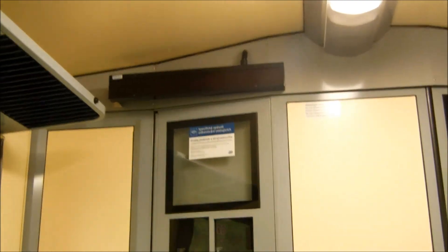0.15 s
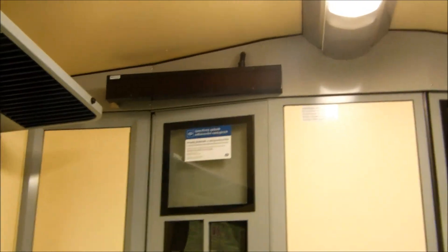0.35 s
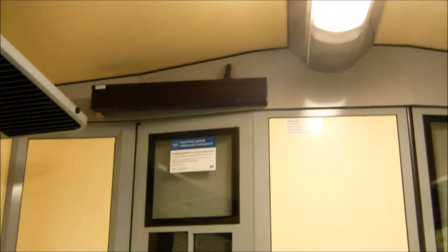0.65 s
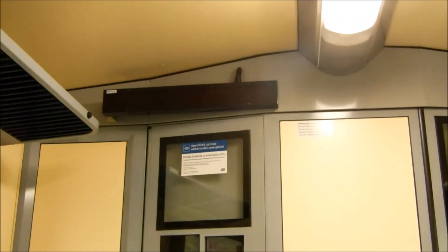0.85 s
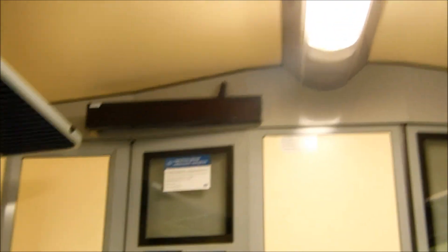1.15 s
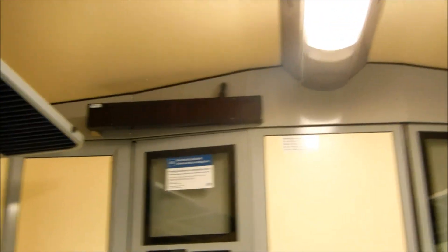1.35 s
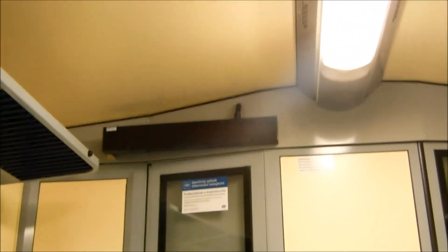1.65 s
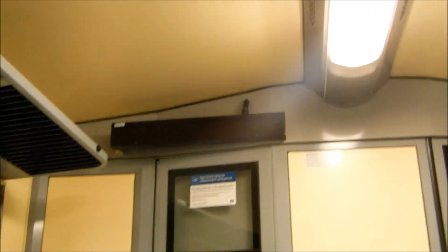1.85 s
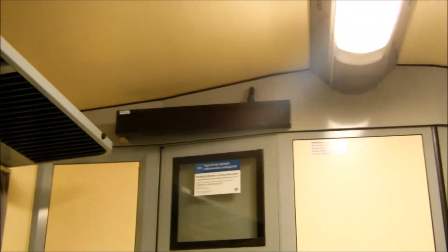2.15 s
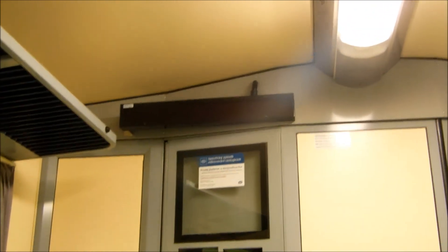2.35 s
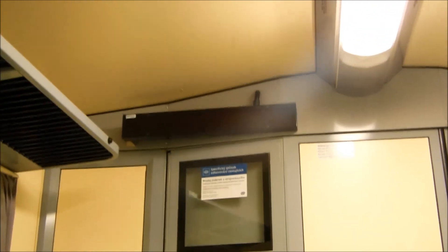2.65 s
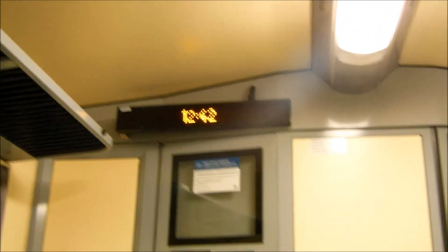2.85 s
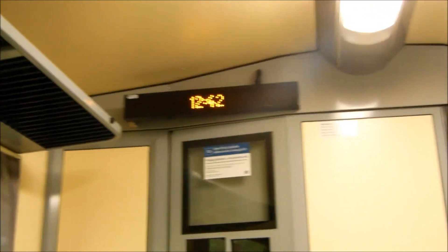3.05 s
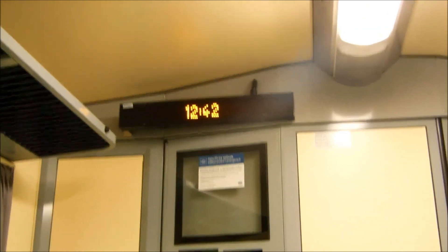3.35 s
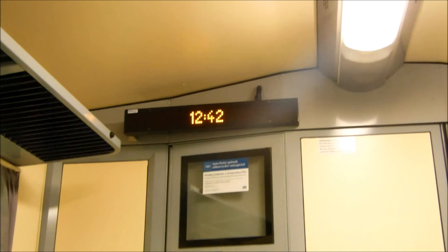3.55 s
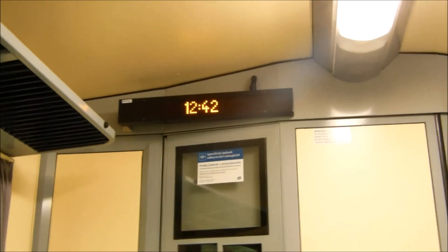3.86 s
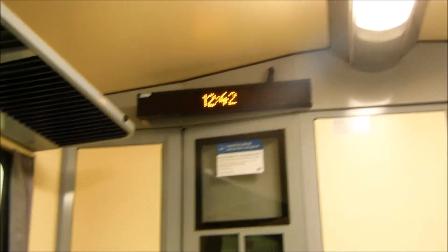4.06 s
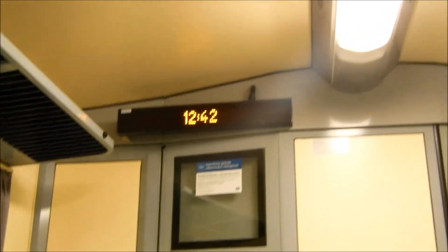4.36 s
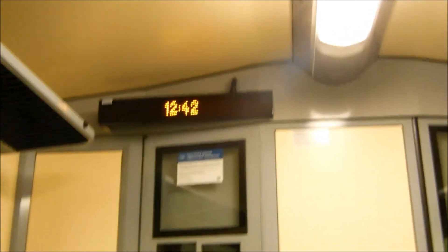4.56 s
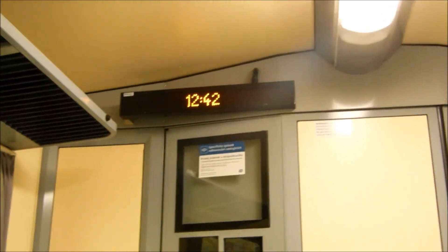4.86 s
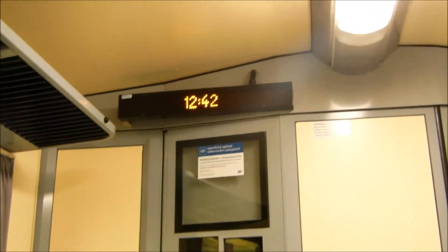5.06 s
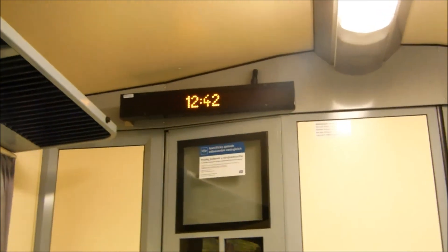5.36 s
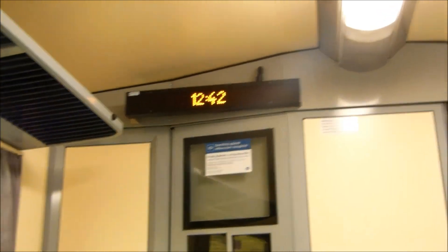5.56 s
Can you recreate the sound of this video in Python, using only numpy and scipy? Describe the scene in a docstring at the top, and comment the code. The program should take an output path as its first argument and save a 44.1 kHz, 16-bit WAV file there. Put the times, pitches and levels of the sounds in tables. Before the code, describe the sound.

Inside a moving passenger train, heavy low rumble throbs and swells continuously over a dull wheel roar and soft flickering rattle.

```python
"""A deep, uneven boom fills the carriage of a running passenger train, heard at two microphone ports.
Wheels on rough rail shake the bogies (wheel frames) and the body shell, which boom at their low modes.
A hum near 160 Hz wavers in the boom: a tone mixed with narrow noise. Noise shaped in pitch and time
makes the roar of the wheels through the floor and the gusts of buzz from loose trim."""
import sys
import numpy as np
from scipy import signal
from scipy.fft import irfft, next_fast_len
from scipy.io import wavfile
from scipy.ndimage import uniform_filter1d

SR = 44100
rng = np.random.default_rng(int(sys.argv[2]) if len(sys.argv) > 2 else 0)


def transcribe(signal):
    """Save signal, clipped to [-1, 1], as a 16-bit WAV file at the path in sys.argv[1]."""
    frames = np.atleast_2d(signal).T
    limited = np.clip(frames, -1, 1)
    pcm = np.round(limited * 32767).astype(np.int16)
    wavfile.write(sys.argv[1], SR, pcm)


N = 251811  # length of the sound in samples


def gain_of(db):
    """Turns decibels into an amplitude factor."""
    return 10 ** (np.asarray(db) / 20)


def evened(x):
    """Scales a signal to an rms (average strength) of 1."""
    return x / np.sqrt(np.mean(x ** 2) + 1e-20)


def read(points, hz):
    """Reads a curve of (f/Hz, value) between its points, on a log-frequency axis."""
    f, value = np.transpose(points)
    return np.interp(np.log(hz + 1), np.log(f + 1), value)


def columns(rows, t):
    """Reads every column of a (t/s, values...) table at the times t."""
    s, *values = np.transpose(rows)
    return [np.interp(t, s, v) for v in values]


def resonance(hz, f, width):
    """A peak of height 1 at f that falls to one half at width / 2 on either side."""
    return 1 / (1 + (2 * (hz - f) / width) ** 2)


def steadied(x, seconds):
    """Evens out the slow chance swells of a two-channel noise, so that the shaking can set its level."""
    width = max(round(seconds * SR), 1)
    power = (x ** 2).mean(0)
    power = uniform_filter1d(uniform_filter1d(power, width), width)
    return x / np.sqrt(abs(power) + 1e-3)


def port_pair(shape, hz):
    """Random spectra at two ports: mostly alike in the bass, much less alike in the treble."""
    # left-right likeness; 1 is identical, 0 unrelated, below 0 partly opposite: (f/Hz, likeness)
    likeness_points = [(60, 0.87), (110, 1.0), (200, 0.98), (370, 0.99), (670, 0.99), (1230, 0.92),
                       (2250, 0.74), (4120, 0.32), (7540, -0.2), (13800, 0.34)]
    a, b, c, d = np.moveaxis(rng.standard_normal(shape + (4,)), -1, 0)
    same = np.clip(read(likeness_points, hz), -1, 1)
    left = a + 1j * b
    unrelated = c + 1j * d
    right = same * left + np.sqrt(1 - same ** 2) * unrelated
    return np.array([left, right])


def smooth_noise(shape, *widths):
    """Random values averaged over the given width along each axis, then scaled to rms 1."""
    x = rng.standard_normal(shape)
    for axis, width in enumerate(widths):
        x = uniform_filter1d(x, size=width, axis=axis)
    return evened(x)


def wide_noise(colour_db, size, patchy_db, flicker_db, ripple_db):
    """Short-time random spectra with drifting patches, a flicker shared by all pitches and a fixed ripple."""
    # left minus right level: (f/Hz, difference/dB)
    leftward_points = [(200, 0), (1500, -0.05), (2600, -0.7), (4000, -0.3), (5500, -4), (7500, -5.5),
                       (9500, -5.5), (11500, 5), (14000, 3)]
    hop = size // 4
    frames = 4 * N // size + 5
    hz = np.fft.rfftfreq(size, 1 / SR)
    t = np.arange(frames)[:, None] * size / 4 / SR

    patches = smooth_noise((frames, len(hz)), 10, 12)
    flicker = smooth_noise(frames, 4)[:, None]
    ripple = smooth_noise(len(hz), 2)  # the many small modes of the cabin
    field_db = patchy_db * patches + flicker_db * flicker + ripple_db * ripple

    spectra = port_pair(patches.shape, hz) * gain_of(colour_db(t, hz) + field_db)
    half_each_way = np.array([.5, -.5])[:, None, None]
    spectra *= gain_of(half_each_way * read(leftward_points, hz))
    _, sound = signal.istft(np.swapaxes(spectra, 1, 2), nperseg=size, noverlap=size - hop)
    return evened(sound[:, :N])


def gusts(t):
    """Lift/dB and tilt/(dB per octave) of the buzz: a gust fades in, drifts in strength and fades out."""
    # gusts of buzzing trim:
    # (start/s, length/s, lift at start/dB, lift at end/dB, added brightness/(dB per octave))
    gust_rows = [(0.032, 0.099, 4, 1.5, 0), (0.298, .42, 2, 4.5, .5), (0.819, .22, 5, 4, .3),
                 (1.099, .19, 6, 10, 0), (1.357, .27, 5, 1.5, -1.5), (1.72, .25, 5.5, 3, 1),
                 (2.043, .14, 3.5, 0.5, 0.3), (2.239, .11, 6, 2.5, -0.5), (2.467, 0.091, 6, 3.5, 1.1),
                 (2.6, .2, 2, 3, 0.3), (2.9, .12, 1.5, 3, -0.5), (3.096, .45, 6.5, 6, -0.7),
                 (3.617, .1, 2, 2, -1), (3.811, .24, 5.5, 4.5, -0.4), (4.242, .17, 2.5, 3.5, .7),
                 (4.456, .07, 7.5, 5.5, -1.1), (4.822, .12, 2, 5, -0.2), (5.0, .05, 3, 4, -1.2),
                 (5.258, .24, 2, 4, 0.5), (5.568, .07, 3.5, 4, -.3)]
    edge_s = 0.024  # sets how quickly a gust fades in and out
    lift_db = 0
    tilt_db = -0.2  # brightness between gusts, dB per octave
    for s, length, first_db, last_db, bright_db in gust_rows:
        on = .5 * (np.tanh((t - s) / edge_s) - np.tanh((t - s - length) / edge_s))
        lift_db = lift_db + on * np.interp(t, [s, s + length], [first_db, last_db])
        tilt_db = tilt_db + on * bright_db
    return lift_db, tilt_db


def buzz_colour(t, hz):
    """The buzz tilts about 5 kHz as different trim takes over; a loose part rings out in the gusts."""
    # basic colour of the buzz: (f/Hz, relative level per Hz/dB)
    buzz_points = [(880, -30.5), (1500, -7.5), (2540, -14.5), (3370, -10), (4910, -15), (8150, -14.5),
                   (11900, -23.5), (13700, -22.5), (14200, -30.5)]
    # the loose part that rattles: (f/Hz, width/Hz, lift/(dB per dB of buzz))
    f, width, lift = (2800, 650, 0.41)
    gust_db, tilt_db = gusts(t)
    rattle_db = lift * (gust_db - gust_db.mean()) * resonance(hz, f, width)
    return read(buzz_points, hz) + tilt_db * np.log2(hz / 5000 + .05) + rattle_db


def roar_colour(t, hz):
    """The roar comes through floor panels that lift a few bands; its colour stays the same over time."""
    # colour of the roar ahead of the panels: (f/Hz, relative level per Hz/dB)
    roar_points = [(140, -37.5), (240, -11), (280, -9.5), (327, -7.5), (410, -9.5), (479, -16), (552, -16),
                   (645, -19), (774, -21.5), (1060, -30), (1230, -30.5), (2530, -41), (7000, -55.5),
                   (9100, -81), (15400, -120)]
    # bands changed by the floor panels: (f/Hz, width/Hz, lift/dB)
    panel_rows = [(314, 11, 2.5), (423, 13, 0.5), (531, 35, 4.5), (772, 61, 4.5), (890, 21, -2.5),
                  (900, 11, 4), (1190, 29, 2), (1230, 9.6, 5.5)]
    return read(roar_points, hz) + sum(db * resonance(hz, f, width) for f, width, db in panel_rows)


def rolling():
    """The roar of wheels on rail, with the trim buzzing above it; the roar swells a little in the gusts."""
    # the roar apart from its swell in the gusts: (t/s, level/dB)
    ride_rows = [(0.03, -34), (0.39, -32.5), (0.72, -32.5), (0.78, -31), (2.68, -31), (2.89, -32.5),
                 (3.41, -29.5), (3.63, -34), (3.71, -31.5), (3.74, -32), (4.03, -30.5), (4.07, -35),
                 (4.37, -30.5), (4.49, -33.5), (5.02, -29.5), (5.06, -35), (5.24, -29), (5.67, -30)]
    buzz_db = -56.5  # between gusts
    t = np.arange(N) / SR
    gust_db, _ = gusts(t)
    ride_db, = columns(ride_rows, t)
    roar = wide_noise(roar_colour, size=4096, patchy_db=0.87, flicker_db=0.23, ripple_db=1.56)
    buzz = wide_noise(buzz_colour, size=1024, patchy_db=2.0, flicker_db=0.9, ripple_db=0.4)
    return gain_of(ride_db + 0.22 * gust_db) * roar + gain_of(buzz_db + gust_db) * buzz


def hum():
    """A tone that wavers in pitch and beats with its own fuzz, a narrow noise around the same pitch."""
    # the wavering tone: (t/s, f/Hz, level/dB)
    hum_rows = [(0.0, 160.8, -13.5), (0.16, 166, -19.5), (0.38, 159.5, -16.5), (0.51, 164.3, -30.5),
                (0.6, 162.4, -12.5), (0.68, 162, -20.5), (0.78, 160, -12.5), (0.84, 166.9, -21.5),
                (1.0, 165.6, -10), (1.06, 171.7, -30), (1.16, 162.2, -16), (1.38, 171.1, -21),
                (1.59, 171.0, -20.5), (1.73, 162.9, -22.5), (1.78, 163.1, -9.5), (2.15, 164.9, -18),
                (2.22, 161, -20.5), (2.61, 162.7, -19), (2.7, 163.6, -11.5), (2.91, 166, -31),
                (3.01, 163.3, -16), (3.16, 161.2, -13), (3.23, 155.9, -23), (3.39, 167.4, -10),
                (3.59, 159.7, -18.5), (3.7, 161.8, -8), (3.75, 157.7, -26), (3.83, 163.2, -9.5),
                (3.91, 166.8, -14.5), (4.66, 163.8, -22.5), (4.91, 160.4, -19.5), (4.96, 167.9, -16),
                (5.02, 172, -31), (5.14, 167.0, -24), (5.58, 166.8, -17.5), (5.71, 171.3, -26)]
    fuzz_share, width_hz = 0.29, 11.3  # fuzz relative to the tone; width of each of two smoothing stages
    hz, level_db = columns(hum_rows, np.arange(N) / SR)
    r = np.exp(-np.pi * width_hz / SR)
    fuzz = signal.lfilter([1], [1, -2 * r, r * r], rng.standard_normal((N, 2)), axis=0)
    fuzz = evened(fuzz) @ [1, 1j]
    carrier = np.exp(2j * np.pi * np.cumsum(hz) / SR)
    tone = ((1 + fuzz_share * fuzz) * carrier).real
    left_right = gain_of([[.15], [-.15]])
    return gain_of(level_db) * evened(tone) * left_right


def swells(rows, t, rise_s):
    """Each row lifts its columns in a smooth hump; overlapping humps add."""
    s, fall_s, *lifts_db = np.transpose(rows)
    late = t[:, None] - s
    hump = np.exp(-(late / np.where(late < 0, rise_s, fall_s)) ** 2)
    return [hump @ lift_db for lift_db in lifts_db]


def shaking():
    """Level in dB of bounce, bogie, lower shell and upper shell, as jolts and throbs come and go."""
    # jolts from the track: (t/s, fall/s, lift of the bounce/dB, lift of the bogie/dB)
    jolt_rows = [(.85, 0.17, 0, 6), (1.05, 0.14, 5.5, -1), (1.27, .3, 5, 11.5), (1.45, .15, 7.5, -2.5),
                 (1.87, .22, 8, 2.5), (2.4, 0.19, 1, 6), (2.89, 0.22, 10, 11.5), (3.3, .12, 6, -0.5),
                 (3.5, 0.14, 3.5, 3.5), (4.08, 0.091, 7.5, -3.5), (4.48, .2, 4, 9.5), (4.66, 0.16, 8, 7),
                 (4.95, 0.16, 1, 5.5), (5.33, .3, 7, 5.5)]
    # throbs of the upper shell, about every half second: (t/s, fall/s, lift/dB)
    throb_rows = [(.47, 0.12, 6), (1.06, 0.11, 5), (1.55, .17, 5), (2.22, 0.051, 13), (2.7, 0.12, 7),
                  (3.05, .1, 4), (3.34, 0.071, 8), (3.55, 0.052, 4), (3.77, 0.13, 7.5), (4.23, 0.089, 9),
                  (4.76, .16, 6.5), (5.3, 0.13, 8.5)]
    # boom of the lower shell: (t/s, level/dB)
    boom_rows = [(0.0, -25.5), (0.86, -16), (0.95, -25.5), (1.16, -16.5), (1.19, -20), (2.53, -25),
                 (3.18, -18.5), (3.26, -13), (3.34, -28.5), (3.54, -18), (3.58, -29.5), (4.17, -25),
                 (4.18, -19), (4.76, -27.5), (4.82, -18), (4.9, -30), (4.98, -19), (5.04, -33.5),
                 (5.37, -17.5), (5.47, -30), (5.53, -14), (5.71, -24)]
    calm_bounce_db, calm_bogie_db, calm_upper_db = -26.5, -29.5, -23.5  # between jolts and throbs
    t = np.arange(0, N + 256, 256) / SR  # coarse time steps, filled in below
    bounce_db, bogie_db = swells(jolt_rows, t, rise_s=0.065)
    throb_db, = swells(throb_rows, t, rise_s=.1)
    lower_db, = columns(boom_rows, t)
    levels_db = calm_bounce_db + bounce_db, calm_bogie_db + bogie_db, lower_db, calm_upper_db + throb_db
    return [np.interp(np.arange(N) / SR, t, db) for db in levels_db]


def shell():
    """Broadband shaking rings each group of modes; every mode is a steep resonance."""
    # modes rung by each kind of shaking: (f/Hz, width/Hz, relative level/dB)
    bounce_modes = [(11.1, 10, -4), (27.4, 18, -1), (37, 7.5, -3.5)]
    bogie_modes = [(58.4, 6, 0.83), (73.2, 6.3, -1.9)]
    lower_modes = [(95, 4.2, -16), (115, 16, -10.5), (139.1, 22, 5)]
    upper_modes = [(184.4, 21.5, -1), (215.1, 18, -6), (231.7, 18, -11), (250.5, 17, -19.5)]
    size = next_fast_len(N)
    hz = np.fft.rfftfreq(size, 1 / SR)
    both, apart = rng.standard_normal((2, len(hz), 2)) @ [1, 1j]
    # long waves reach both ports almost alike; they part a little more as the pitch rises
    apart_gain = gain_of(-28.5 + 2.0 * np.log2(hz / 100 + .1))
    drive = both + apart_gain * np.outer([1, -1], apart)
    out = np.zeros((2, N))
    for modes, level_db in zip((bounce_modes, bogie_modes, lower_modes, upper_modes), shaking()):
        power = sum(gain_of(2 * db) * resonance(hz, f, width) ** 2 for f, width, db in modes)
        ringing = irfft(drive * np.sqrt(power), size)[:, :N]
        out += gain_of(level_db) * steadied(evened(ringing), 0.11)
    return out


def scene():
    """All sources together."""
    return shell() + hum() + rolling()


def record(dry):
    """The loudest swings round off at a soft knee; then a low-pass filter takes away the highest treble."""
    knee, room = .7, .22  # amplitude where rounding starts, and the most that is left above it
    edge_hz = 14190
    over = np.maximum(abs(dry) - knee, 0)
    soft = dry - np.sign(dry) * (over - room * np.tanh(over / room))
    # mirrored ends let the filter run right up to the edges
    padded = np.pad(soft, ((0, 0), (511, 511)), "reflect", reflect_type="odd")
    low_pass = signal.firwin(1023, edge_hz, window=("kaiser", 9), fs=SR)
    return signal.oaconvolve(padded, low_pass[None], "valid")


dry = scene()
out = record(dry)
transcribe(out)
```